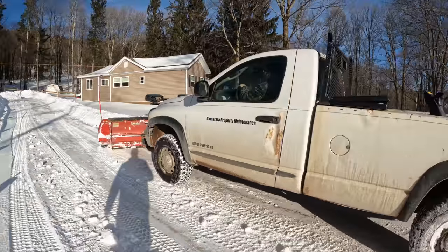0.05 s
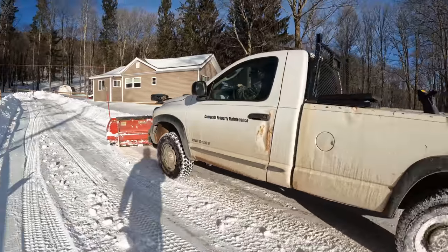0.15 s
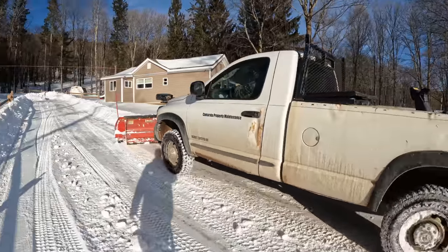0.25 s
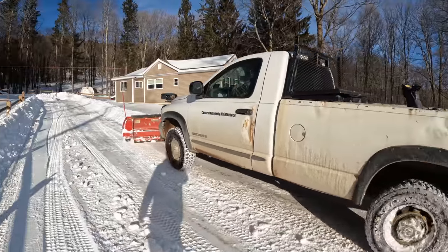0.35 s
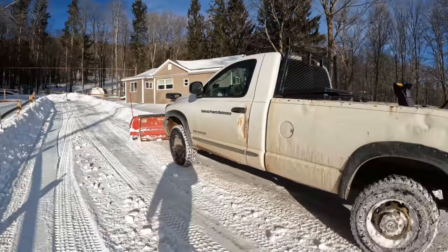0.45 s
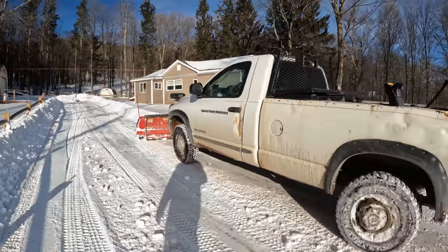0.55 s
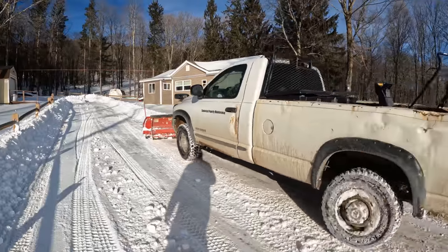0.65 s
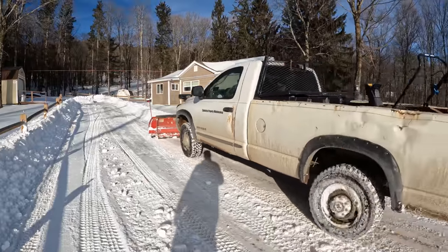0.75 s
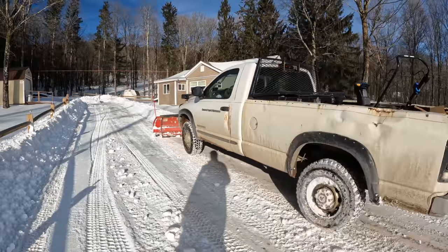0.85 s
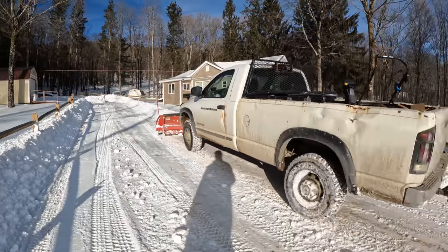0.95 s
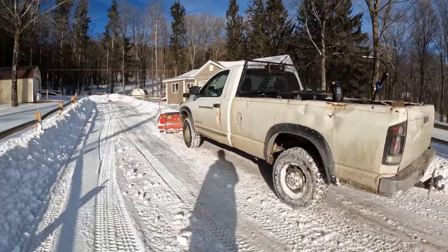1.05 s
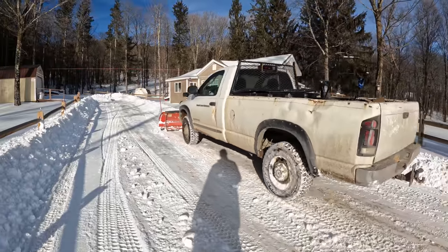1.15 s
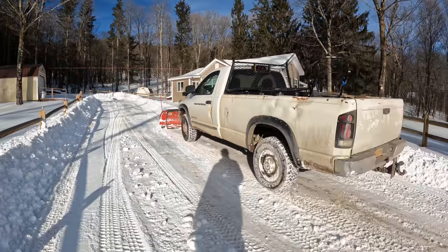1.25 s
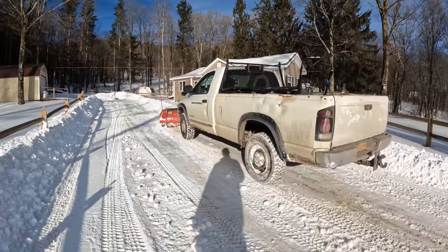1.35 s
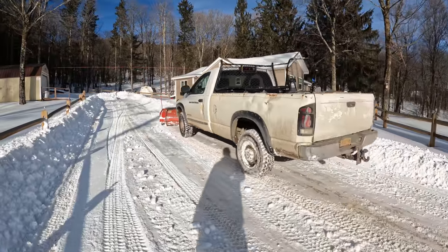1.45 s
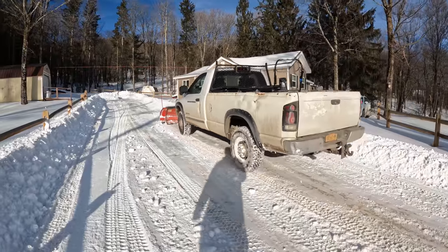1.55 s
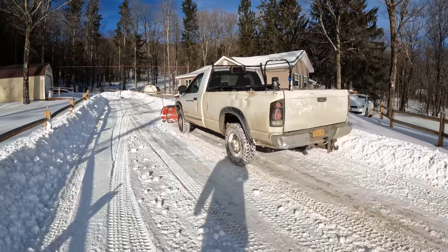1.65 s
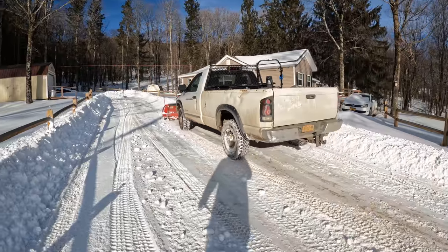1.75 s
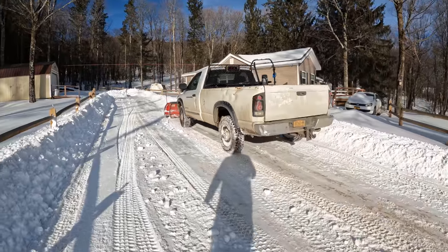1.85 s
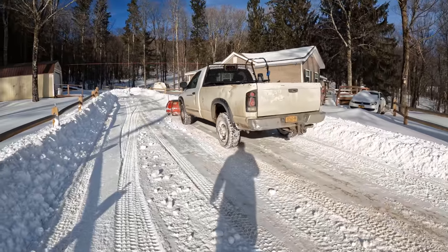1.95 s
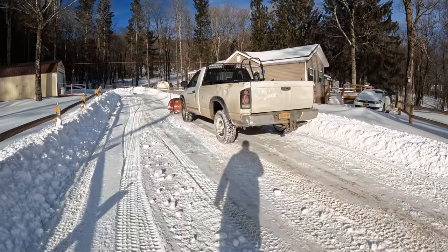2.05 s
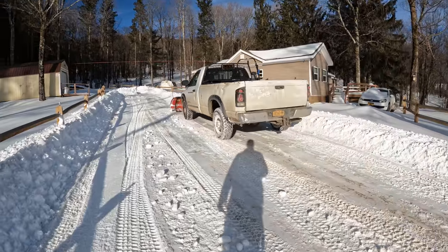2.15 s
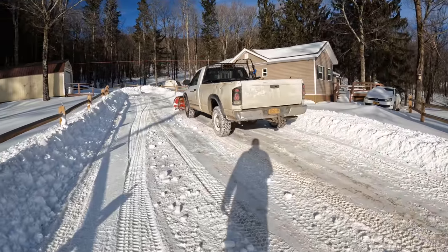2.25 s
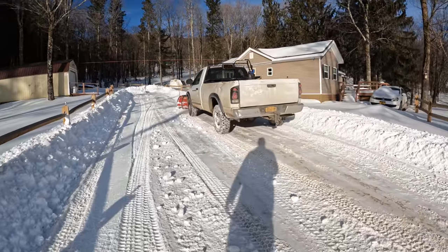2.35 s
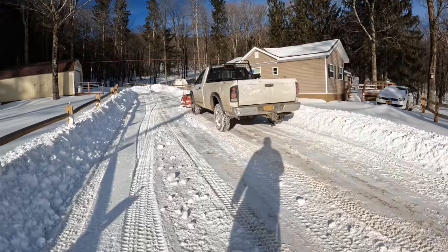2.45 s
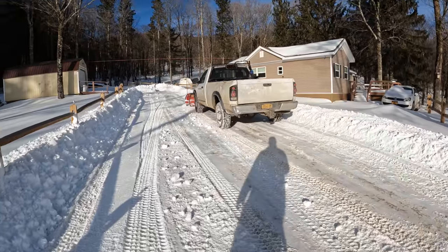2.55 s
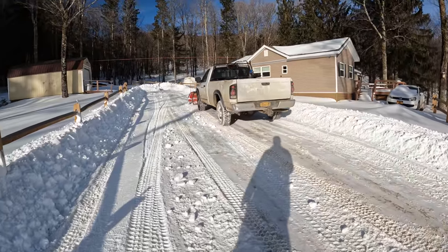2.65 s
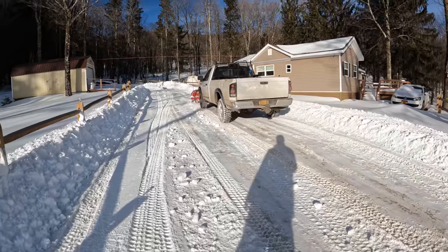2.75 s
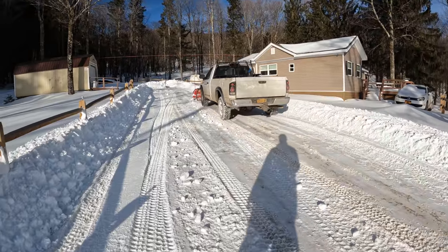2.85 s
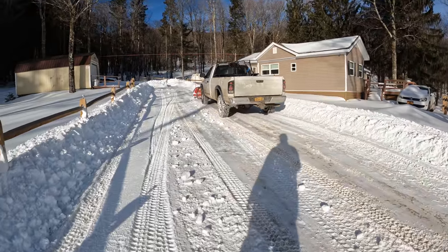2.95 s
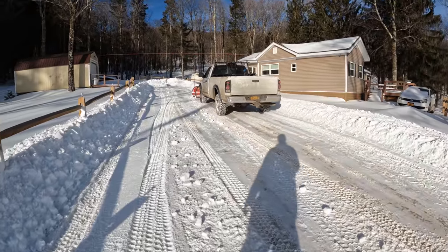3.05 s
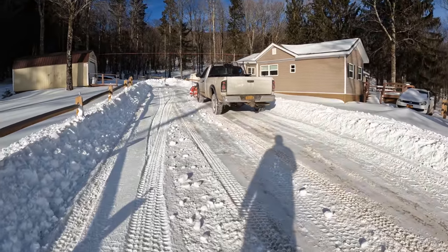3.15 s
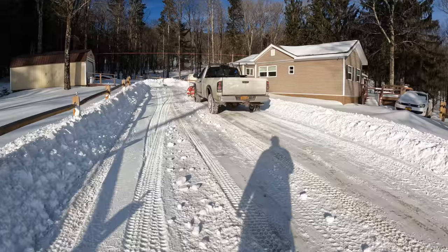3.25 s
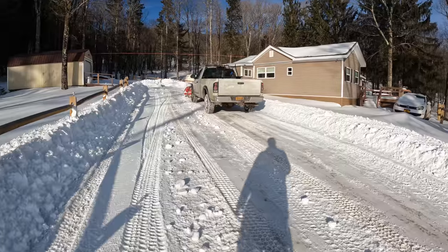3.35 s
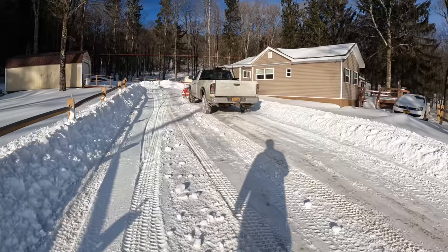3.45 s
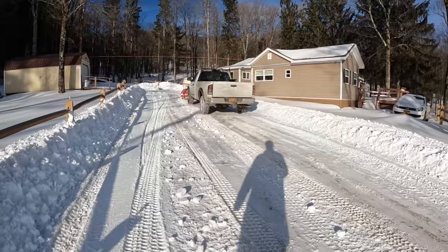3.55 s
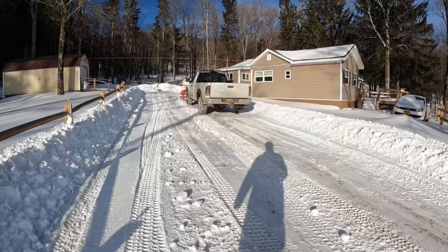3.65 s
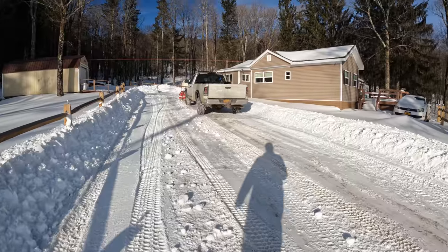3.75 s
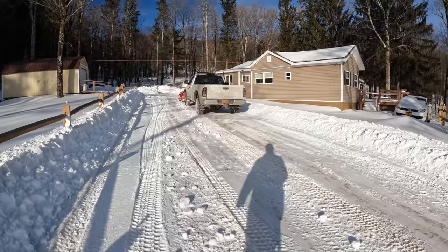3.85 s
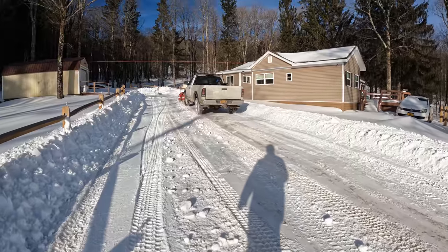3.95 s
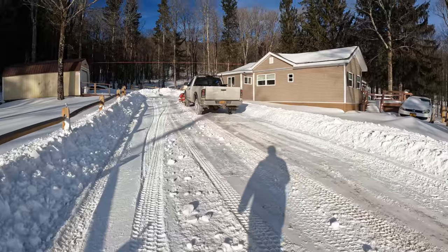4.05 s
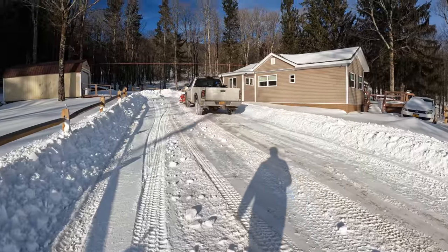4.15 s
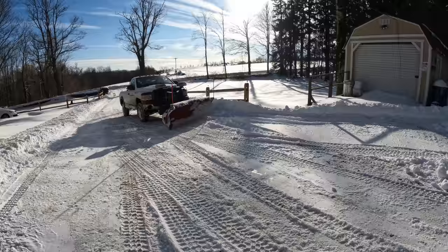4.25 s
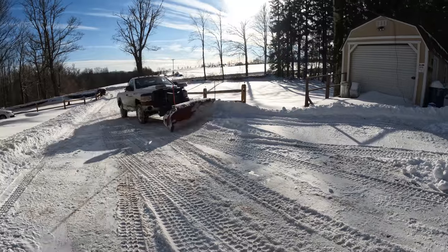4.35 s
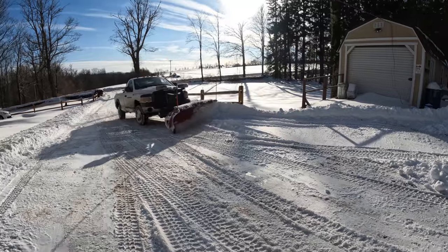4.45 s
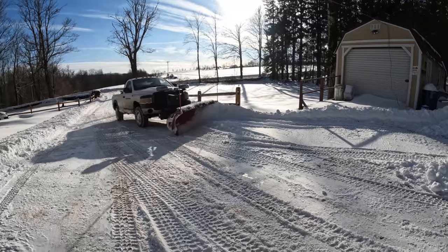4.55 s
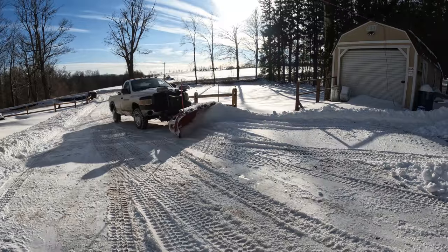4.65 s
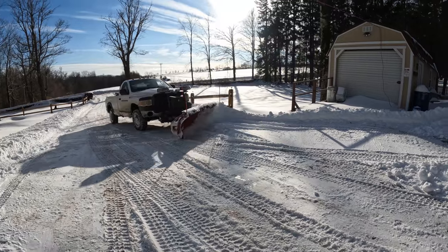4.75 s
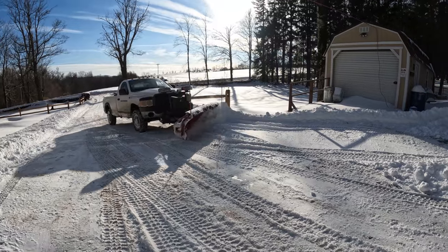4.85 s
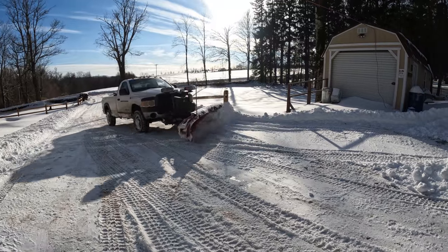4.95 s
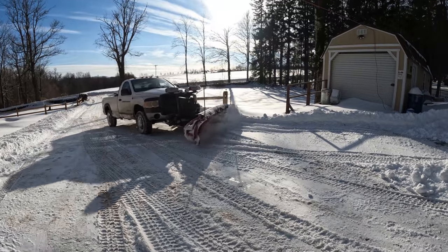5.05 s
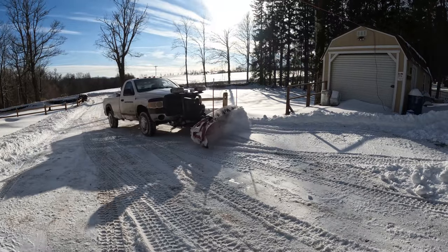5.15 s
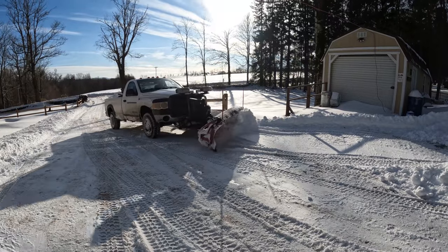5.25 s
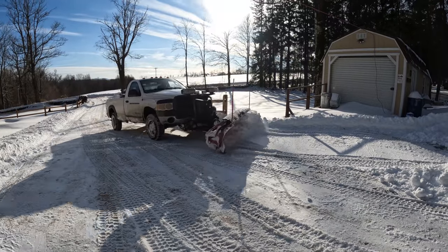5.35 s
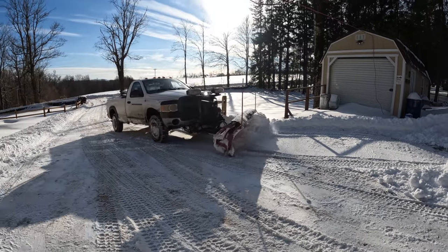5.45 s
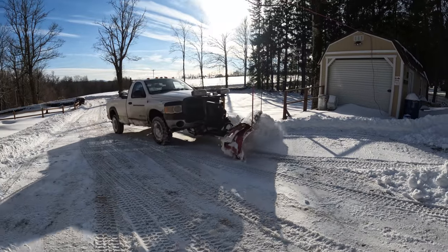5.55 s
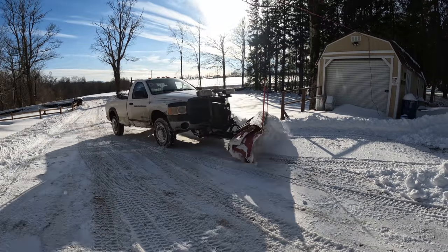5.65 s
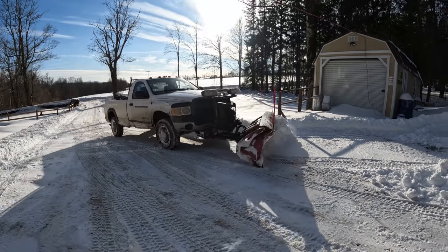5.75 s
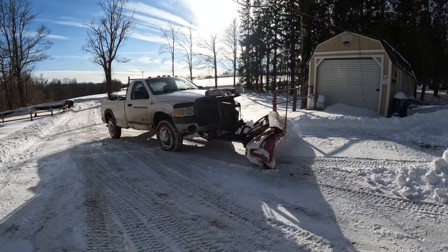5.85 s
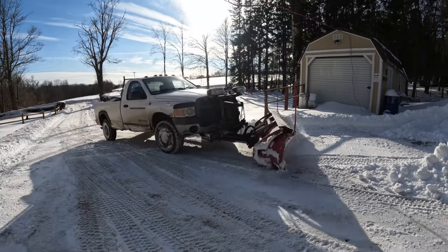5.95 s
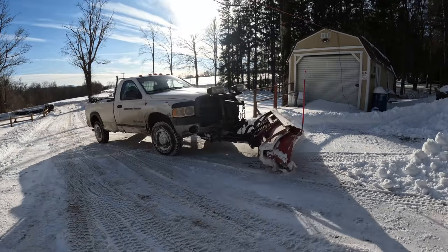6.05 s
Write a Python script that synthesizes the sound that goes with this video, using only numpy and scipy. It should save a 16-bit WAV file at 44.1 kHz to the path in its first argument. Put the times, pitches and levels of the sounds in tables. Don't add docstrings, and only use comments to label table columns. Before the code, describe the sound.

A pickup engine drones hard as it pulls away over packed snow, then abruptly idles closer with a scraping, clanking plow blade in gusty wind.

```python
import sys
import numpy as np
from scipy import signal
from scipy.fft import rfft, irfft, next_fast_len
from scipy.io import wavfile
from scipy.ndimage import uniform_filter1d

SR = 44100
rng = np.random.default_rng(int(sys.argv[2]) if len(sys.argv) > 2 else 0)


def gain_from_db(level_db):
    decades = np.asarray(level_db, float) / 20
    return 10 ** decades


def pcm_store(signal):
    levels = np.round(np.clip(np.atleast_2d(signal), -1, 1) * 32767)
    wavfile.write(sys.argv[1], SR, levels.astype(np.int16).T)


N = 268569
TIME = np.arange(N) / SR
SIZE = next_fast_len(N + SR // 4)
HZ = np.maximum(np.arange(SIZE // 2 + 1) * SR / SIZE, 1)

CHANGE_S = 4.307
FIRST = TIME < CHANGE_S

NEAREST_M, AWAY_M, EVENING_S = 3, 5.65, 2.9
START_M, APPROACH_M_S = 7.63, 2.04
TURN_S, TURN_TAKES_S = 2.17, 0.36

# [t/s, firing rate f/Hz, firing tone level/dB]
ENGINE = [
    [(0, 92.3, -17), (.35, 91.4, -15.5), (.8, 93.15, -17.5), (1.2, 94.3, -14), (1.55, 95.2, -14),
     (2.1, 95.54, -16), (2.8, 94.87, -18), (3.4, 93.8, -19.5), (3.8, 93.44, -20.5), (4.3, 93, -21.5)],
    [(4.33, 76.2, -43), (4.45, 77.45, -25), (4.63, 78.43, -22.5), (4.85, 79.6, -24.5), (5.15, 77.5, -23.5),
     (5.42, 76.6, -20.5), (5.8, 76.76, -20), (6.09, 77.3, -20.5)],
]
STRONG = (1.5, 2, 4, 7)
# [alongside level/dB, from behind level/dB, from the front level/dB]
OVERTONES = [(-23.5, -20, -27.5), (-27, -37, -20.5), (-46.5, -41.5, -38), (-45.5, -42.5, -45.5)]
# [multiple, t/s, half-length t/s, level/dB]
ECHOES = [(1.5, 0.33, 0.13, -18), (1.5, 0.81, 0.34, 7), (1.5, 1.333, 0.19, -25), (1.5, 4.8, .08, -12),
          (1.5, 5.4, 0.067, 7), (1.5, 5.9, 0.11, 4), (1.5, 7.1, 0.07, 3), (2, 1.1, 0.15, -12),
          (2, 2, 0.74, 4.5), (2, 4.32, 0.15, 3), (2, 5.2, 0.26, 2), (4, 2.05, 0.37, 13), (4, 3.4, 0.22, 0),
          (7, .15, 0.042, 15), (7, 1.424, 0.27, 18.5), (7, 4.7, .15, 12.5), (7, 5.85, 0.097, 14.5)]
# [multiple of the firing rate, level/dB]
UNEVEN_LINES = [
    [(.5, -27), (.667, -21), (.833, -28), (1.17, -27), (1.33, -18), (1.67, -23), (1.83, -28), (2.33, -28),
     (2.5, -30), (2.67, -29), (3, -29), (3.33, -38), (4.33, -36)],
    [(.5, -20), (.667, -23), (.833, -25), (1.17, -21), (1.33, -16), (1.67, -19), (1.83, -22), (2.33, -21),
     (2.5, -17), (2.67, -24), (3, -17), (3.33, -23), (4.33, -33)],
]
# [f/Hz, level/dB per Hz]
THROB_NOISE = [
    [(59, -34), (100, -7.5), (163, -6), (188, -9.5), (279, -19), (323, -37.5), (400, -19), (520, -60),
     (880, -120)],
    [(50, -18), (85, 0), (118, -5.5), (167, -1.5), (264, -7.5), (351, -16.5), (400, -23.5), (520, -45),
     (880, -120)],
]

# (level/dB at the nearest distance, dB lost per dB of distance)
ROAR, LOW, HISS = [(-24.5, 0.99), (-22, 1.15)], [(-36.5, 0.56), (-24.5, 0.64)], [(-34.5, 1.824), (-37.5, 0.63)]
TAIL_HISS_DB = 4.5
# [t/s, half-length t/s, roar level/dB, throb level/dB, hiss level/dB]
LIFTS = [
    (.7, 0.56, 1, 2.5, 1.1),
    (1.55, 0.16, 1.6, -5, -1),
    (4.3, 0.079, -3.5, 0.5, 1.3),
    (4.34, 0.052, 8, 5, -1.8),
    (4.97, 0.18, 1.5, 0.5, 2.5),
    (5.95, 0.055, -1.6, 4, 0.1),
    (6.08, 0.042, 2.5, 1, 4),
]
# [start level/dB, end level/dB]
PAN_DB = [
    (-3, -0.98),
    (0, -1.4),
]

# [f/Hz, level/dB per Hz]
SIDE_ON = [(190, -9.5), (330, -7), (450, -5.5), (600, -6.5), (1000, -4), (1700, -8), (2400, -12.5),
           (3000, -12), (3600, -18.5), (5000, -22.5), (6600, -29), (7700, -28.5), (16000, -39.5)]
BEHIND = [(190, -55.5), (330, -22.5), (400, -5.5), (600, -12), (900, -11.5), (1500, -15.5), (2500, -12.5),
          (3600, -20.5), (5000, -23), (6000, -27.5), (6600, -28), (7700, -29.5), (16000, -41.5)]
FRONT = [(190, -25), (330, -18.5), (400, -9), (550, -7), (750, -6.5), (1000, -8), (1600, -9), (2000, -9),
         (3000, -11), (3600, -14.5), (5000, -17.5), (7700, -22.5), (16000, -29)]
# [f/Hz, width f/Hz, boost level/dB]
SIDE_RINGS = [(756, 71, 1.5), (1726, 40, 3), (2750, 99, 4), (4370, 73, 1.5)]
BEHIND_RINGS = [(514, 220, 4.5), (753, 45, 10.5), (1260, 360, 7.5), (1827, 380, 11), (2396, 83, 11.5),
                (3190, 440, 6), (4750, 78, 7), (5770, 820, 8), (2280, 130, -3.5), (4000, 490, -2.5)]
FRONT_RINGS = [(540, 99, 3.7), (1130, 240, 4.5), (2000, 300, 1.8), (2840, 77, 3)]

# [t/s, half-length t/s, level/dB over calm]
GUSTS = [
    (0, 0.22, 9),
    (1.65, 0.28, 13.5),
    (2.28, 0.082, 13.5),
    (2.9, 0.54, 8.5),
    (4.05, .12, 18.5),
    (4.6, 0.34, 11.5),
    (5.5, 0.19, 4.5),
    (6.0, .12, 11),
]
# [f/Hz, level/dB per Hz]
RUMBLE = [(12, -22), (22, -18), (38, -5.5), (50, -7), (62, -7), (80, -12), (100, -38), (180, -60)]
CALM_DB, WIND_APART_DB = -35.5, -18

# [t/s, half-length t/s, level/dB]
PIPE = [
    (.25, 0.19, 12),
    (1.05, 0.29, 11.5),
    (2.95, 0.49, 8),
    (3.8, 0.64, 11.5),
]
PIPE_HZ, PIPE_DB = 513, -22
# [t/s, half-length t/s, level/dB]
ARCH = [
    (1.7, 0.78, 16),
    (2.6, 0.68, 13),
]
ARCH_HZ, ARCH_SAG_HZ_PER_S, ARCH_DB = 1562, 170, -25

# [t/s, blade peak level/dB, crack level/dB, rattle length t/s]
CLANKS = [(2.894, -20, -46.5, 0.029), (3.25, -31, -41, .012), (4.025, -28, -42, 0.012),
          (4.313, -15.5, -38, 0.03), (4.436, -19, -35, 0.018), (4.463, -8.5, -33, 0.022),
          (4.486, -14.5, -44, 0.016), (4.67, -18.5, -45, 0.021), (4.795, -16.5, -37, 0.0081),
          (4.832, -23.5, -33.5, 0.012), (4.879, -23, -29.5, 0.018), (4.954, -17, -41, 0.035),
          (4.991, -12, -40, .028), (5.1, -16, -43.5, 0.016), (5.38, -9.5, -48.5, 0.015),
          (5.694, -26, -44, 0.0065), (5.752, -22, -36.5, 0.011), (5.768, -14.5, -39, 0.016),
          (5.806, -19, -39.5, 0.048), (5.993, -9.5, -33, 0.023), (6.039, -10, -35.5, 0.018),
          (6.081, -17.5, -34, 0.027)]
# [f/Hz, t60 t/s, level/dB]
BLADE_MODES = [(1010, .04, 0), (1180, .03, -4), (1850, .02, -4), (2050, .02, -3), (2900, .012, -5)]
MOUNT_HZ, MOUNT_LOADED_HZ, MOUNT_LOADS_S = 4790, 4000, 4.8
# [t/s, level/dB]
TICKS = [
    (2.973, -40),
    (3.072, -28),
    (3.125, -38),
    (3.323, -35),
    (5.12, -32),
    (5.77, -26),
    (6.043, -18),
]
# [t/s, half-length t/s, level/dB]
PLATE = [
    (4.66, 0.027, 10.5),
    (4.84, 0.072, 11.5),
    (4.965, 0.023, 16.5),
    (5.1, .1, 6),
]
PLATE_HZ, PLATE_LOADED_HZ, PLATE_LOADS_S, PLATE_DB = 1032, 824, 5.5, -11.5
# [t/s, peak level/dB, length t/s]
SQUEAKS = [
    (4.783, -36, 0.024),
    (4.845, -43, 0.016),
    (5.132, -39.5, 0.025),
    (5.251, -40, 0.013),
    (5.267, -36.5, 0.023),
    (5.44, -41, 0.016),
]
SQUEAK_HZ = 9380
# [level/dB, f/Hz, t60 t/s]
THUD = (-13, 150, .09)
THUD_S = 5.938

# [f/Hz, level/dB]
MIC = [(20, -0.5), (7800, -1), (8300, -7), (9000, -9.5), (10700, -12), (11700, -12), (12600, -13.5),
       (13500, -21), (15500, -24.5), (20000, -36)]
# [f/Hz, likeness 0-1, left leads by phase/rad, left minus right level/dB]
PORTS = [(20, .985, 0, 0), (70, 1, 0, 0), (180, 1, 0, 0), (300, .97, -.15, 0), (1000, .92, -.3, 0),
         (3200, .87, -.65, .5), (7500, .84, -.22, 1.5), (9300, .55, -.45, 3), (10500, .6, -.3, 3),
         (11500, .9, 0, 2), (13500, .45, 0, 1)]
CHANGE_CLICK_DB = -27


def unit(x):
    return x / np.sqrt(np.mean(x ** 2))


def on_log_hz(table, column=1):
    table = np.array(table, float)
    return np.interp(np.log(HZ), np.log(table[:, 0]), table[:, column])


def columns(scenes):
    first, second = ([np.interp(TIME, np.array(s)[:, 0], c) for c in np.array(s)[:, 1:].T] for s in scenes)
    return np.where(FIRST, first, second)


def walk(rate):
    k = int(SR / rate)
    held = np.repeat(rng.standard_normal(N // k + 1), k)
    return 0.76 * uniform_filter1d(uniform_filter1d(held, k), k)[:N]


def swell(rows, column=2):
    return sum(r[column] * np.exp(-((TIME - r[0]) / max(r[1], .01)) ** 2) for r in rows)


def step(s, takes):
    return 1 / (1 + np.exp(-(TIME - s) / takes))


def shape(x, gain):
    return irfft(rfft(x, SIZE) * gain, SIZE)[:N]


def noise(gain):
    return unit(shape(rng.standard_normal(N), gain))


def hum(hz, db, width_hz, steady=0):
    carrier = np.exp(2j * np.pi * np.cumsum(hz + 0 * TIME) / SR)
    slow = [noise(1 / (1 + (HZ / width_hz) ** 2)) for _ in range(2)]
    return gain_from_db(db) * ((slow[0] + steady) * carrier.real + slow[1] * carrier.imag)


def distance_db():
    away = NEAREST_M + AWAY_M * (1 - np.exp(-TIME / EVENING_S))
    nearing = np.maximum(START_M - APPROACH_M_S * (TIME - CHANGE_S), 1)
    return -20 * np.log10(np.where(FIRST, away, nearing) / NEAREST_M)


def exhaust(phase, firing_db, far_db, behind):
    line_db = [firing_db]
    for k, (side, back, front) in zip(STRONG, OVERTONES):
        facing_db = np.where(FIRST, side + behind * (back - side), front)
        echoes = [e[1:] for e in ECHOES if round(2 * e[0]) == 2 * k]
        line_db.append(far_db + facing_db + swell(echoes))
    out = 0
    for k, db, waver in zip((1, *STRONG), line_db, (0.35, 0.86, 0.52, 0.72, 0.43)):
        angle = k * phase + 0.1 * waver * walk(4.7) + rng.uniform(0, 2 * np.pi)
        out = out + np.sqrt(2) * gain_from_db(db + waver * walk(16)) * np.sin(angle)
    return out


def throb(phase, throb_db):
    lines = 0
    for (k, first_db), (_, second_db) in zip(*UNEVEN_LINES):
        k = round(6 * k) / 6
        db = np.where(FIRST, first_db + 32, second_db + 14) + 3 * walk(5)
        lines = lines + gain_from_db(db) * np.sin(k * phase + .5 * walk(8) + rng.uniform(0, 2 * np.pi))
    first, second = [noise(gain_from_db(on_log_hz(s))) for s in THROB_NOISE]
    murk = np.where(FIRST, gain_from_db(5.0) * first, gain_from_db(2.0) * second)
    lines_db = -6.0 - 0.27 * np.maximum(throb_db + 38.5, 0) * FIRST
    return gain_from_db(throb_db) * (gain_from_db(lines_db) * lines + murk)


def gas_and_snow(phase):
    gas = (1 + 0.096 * np.cos(phase) + 0.053 * np.cos(phase / 2)) * rng.standard_normal(N)
    struck = rng.random(N) < 900 / SR
    size = gain_from_db(3.5 * np.minimum(rng.exponential(size=N), 4))
    grains = struck * size * rng.standard_normal(N)
    grains = signal.lfilter([1], [1, -.97], grains ** 2) ** .5 * rng.standard_normal(N)
    return unit(gas) + np.where(FIRST, .3, .45) * unit(grains)


def colour(spectrum, rings):
    db = on_log_hz(spectrum)
    for hz, width, boost_db in rings:
        db = db + boost_db / (1 + (2 * (HZ - hz) / width) ** 2)
    gain = gain_from_db(db)
    return gain / np.sqrt(np.sum(gain[(HZ > 400) & (HZ < 2500)] ** 2) / len(HZ))


def roar(phase, hiss_db, behind):
    white, together, out = rfft(unit(gas_and_snow(phase)), SIZE), walk(9), 0
    colours = colour(SIDE_ON, SIDE_RINGS), colour(BEHIND, BEHIND_RINGS), colour(FRONT, FRONT_RINGS)
    weights = np.where(FIRST, 1 - behind, 0), np.where(FIRST, behind, 0), 1. * ~FIRST
    hiss = (HZ > 3500) & (HZ < 8000)
    own_db = [10 * np.log10(np.sum(c[hiss] ** 2) / len(HZ)) for c in colours]
    tilt_db = hiss_db - sum(w * db for w, db in zip(weights, own_db))
    for octave in np.arange(0, 7):
        mask = np.cos(np.pi / 2 * np.clip(np.log2(HZ / 250) - octave, -1, 1)) ** 2
        band = sum(w * irfft(white * mask * c, SIZE)[:N] for w, c in zip(weights, colours))
        treble_db = np.clip((octave - 2.5) / 1.5, 0, 1) * tilt_db
        out = out + band * gain_from_db(treble_db + .9 * together + 1.2 * walk(14))
    return out


def wind():
    gain = gain_from_db(on_log_hz(RUMBLE))
    same = noise(gain)
    apart = gain_from_db(WIND_APART_DB) * np.array([[1], [-1]]) * noise(gain / (1 + (HZ / 45) ** 4))
    return gain_from_db(CALM_DB + swell(GUSTS) - 11 + 1.7 * walk(19.0)) * (same + apart)


def tailpipe():
    return FIRST * hum(PIPE_HZ, PIPE_DB + swell(PIPE), 17, steady=1.2)


def wheel_arch():
    hz = np.minimum(ARCH_HZ - ARCH_SAG_HZ_PER_S * TIME, 1390)
    return FIRST * hum(hz, ARCH_DB + swell(ARCH), 110)


def peak(x):
    return x / np.abs(x).max()


def clanks():
    out, t = np.zeros((2, N + SR)), np.arange(SR // 4) / SR
    low = signal.butter(3, (750, 3600), "bandpass", fs=SR, output="sos")
    top = signal.butter(4, (2300, 5500), "bandpass", fs=SR, output="sos")

    def ring(contact, hz, t60):
        decay = np.exp(-np.log(1000) * t / t60) * np.sin(2 * np.pi * hz * t)
        return signal.fftconvolve(contact, decay)[:len(t)]

    for s, blade_db, crack_db, length in CLANKS:
        mount_hz = MOUNT_HZ if s < MOUNT_LOADS_S else MOUNT_LOADED_HZ
        pan_db = np.clip(-.6 + 1.2 * rng.standard_normal(), -3, 2)
        ragged = np.repeat(gain_from_db(3.0 * rng.standard_normal(len(t) // 128 + 1)), 128)[:len(t)]
        fade = np.exp(-(t / max(length, .003)) ** 2) + .2 * np.exp(-t / 0.068) + 0.32 * np.exp(-t / 0.0026)
        contact = rng.standard_normal(len(t)) * ragged * fade
        chance = rng.standard_normal((len(BLADE_MODES), 2))
        blade = 0
        for (hz, t60, db), (louder, higher) in zip(BLADE_MODES, chance):
            blade = blade + gain_from_db(db + 3 * louder) * ring(contact, hz * (1 + .03 * higher), t60)
        mount = ring(contact, mount_hz * (1 + 0.098 * chance[0, 0]), 0.054)
        body = peak(signal.sosfilt(low, contact)) + .5 * peak(blade)
        bright = peak(signal.sosfilt(top, contact)) + 0.55 * peak(mount)
        hit = gain_from_db(blade_db - 2.5) * body + gain_from_db(crack_db + 9) * bright
        i = int(s * SR)
        out[:, i:i + len(t)] += hit * gain_from_db(pan_db * np.array([[.5], [-.5]]))
    return out[:, :N]


def ticks():
    out = np.zeros(N)
    for s, db in TICKS:
        out[int(s * SR)] = gain_from_db(db)
    return signal.sosfilt(signal.butter(1, (1500, 9000), "bandpass", fs=SR, output="sos"), 2 * out)


def plate():
    hz = PLATE_HZ + (PLATE_LOADED_HZ - PLATE_HZ) * step(PLATE_LOADS_S, .2)
    return ~FIRST * hum(hz, PLATE_DB + swell(PLATE), 76)


def squeaks():
    tone = np.sin(2 * np.pi * np.cumsum(SQUEAK_HZ + 50 * walk(76)) / SR)
    level = 0
    for s, db, length in SQUEAKS:
        level = level + gain_from_db(db) * np.exp(-((TIME - s - length / 2) / (0.39 * length)) ** 2)
    return tone * level


def thud():
    db, hz, t60 = THUD
    t = np.maximum(TIME - THUD_S, 0)
    return gain_from_db(db) * np.exp(-np.log(1000) * t / t60) * np.sin(2 * np.pi * hz * t)


def scene():
    far_db, behind = distance_db(), step(TURN_S, TURN_TAKES_S)
    layers_db = []
    for column, ((a, m), (b, n)) in enumerate((ROAR, LOW, HISS), start=2):
        layers_db.append(np.where(FIRST, a + m * far_db, b + n * far_db) + swell(LIFTS, column))
    roar_db, throb_db, hiss_db = layers_db
    hiss_db = hiss_db + TAIL_HISS_DB * FIRST * behind ** 6.7

    firing_hz, firing_db = columns(ENGINE)
    phase = 2 * np.pi * np.cumsum(firing_hz) / SR
    engine = exhaust(phase, firing_db, far_db, behind) + throb(phase, throb_db)
    body = roar(phase, hiss_db - roar_db, behind) + tailpipe() + wheel_arch() + plate()

    spans = (0, CHANGE_S), (CHANGE_S, N / SR)
    pan_db, = columns([list(zip(span, db)) for span, db in zip(spans, PAN_DB)])
    placed = gain_from_db(roar_db) * body * gain_from_db(np.array([pan_db, -pan_db]) / 2)
    return engine + placed + wind() + clanks() + ticks() + squeaks() + thud()


def roll_off(x):
    return signal.sosfilt(signal.butter(12, 15720, fs=SR, output="sos"), x)


def record(dry):
    like = np.clip(on_log_hz(PORTS), 0, 1)
    turn = np.exp(.5j * on_log_hz(PORTS, column=2)) * gain_from_db(on_log_hz(PORTS, column=3) / 2)
    t = np.arange(SR // 5) / SR
    scatter = rfft(rng.standard_normal(len(t)) * np.exp(-t / .03), SIZE)
    scatter = scatter / np.abs(scatter)
    left, right = rfft(dry, SIZE) * gain_from_db(on_log_hz(MIC))
    apart = np.sqrt((1 - like) / 2) * scatter * (left + right) / 2
    same = np.sqrt((1 + like) / 2)
    ports = np.array([(same * left + apart) * turn, (same * right - apart) / turn])
    mix = irfft(ports, SIZE)[:, :N]
    mix[:, int(CHANGE_S * SR)] += gain_from_db(CHANGE_CLICK_DB)
    return roll_off(mix)


dry = scene()
out = record(dry)
pcm_store(out)
```